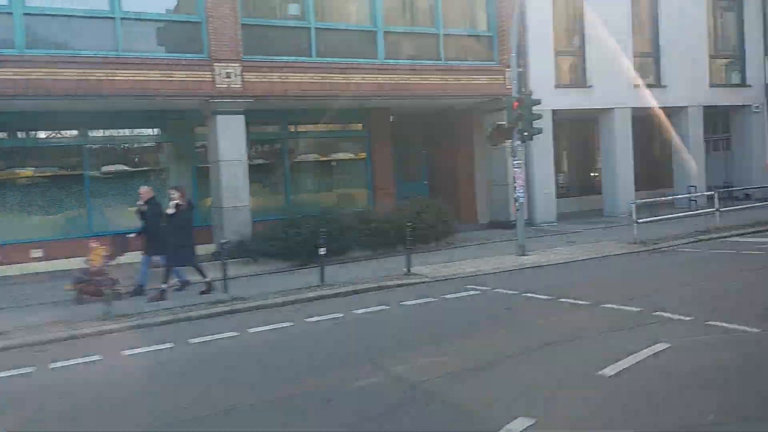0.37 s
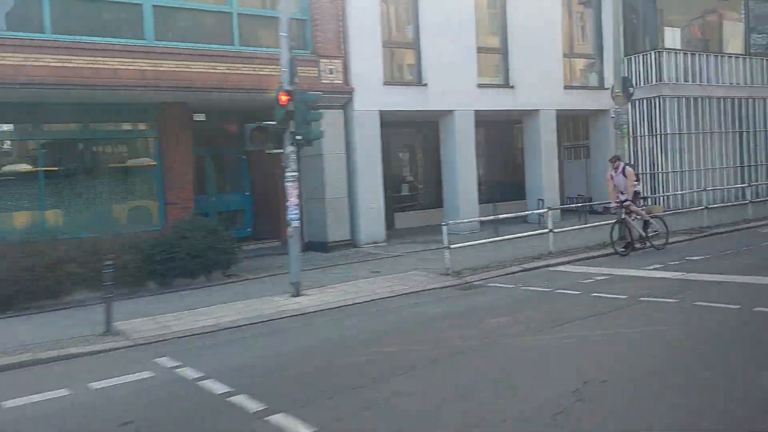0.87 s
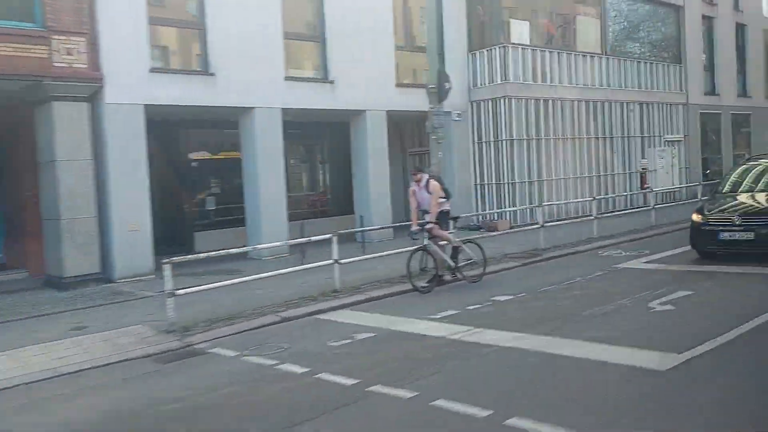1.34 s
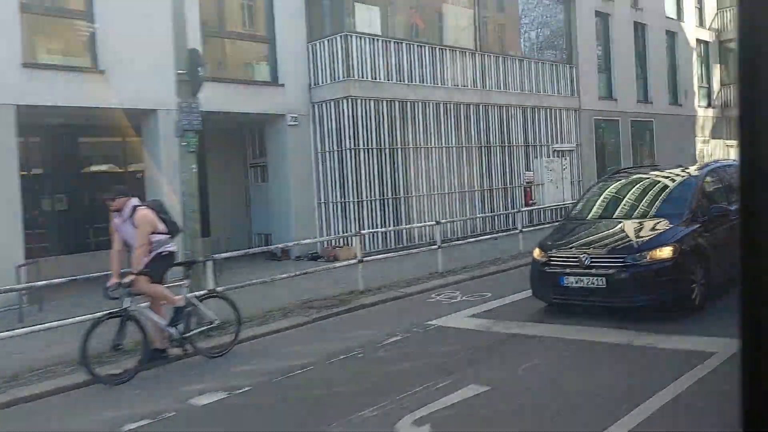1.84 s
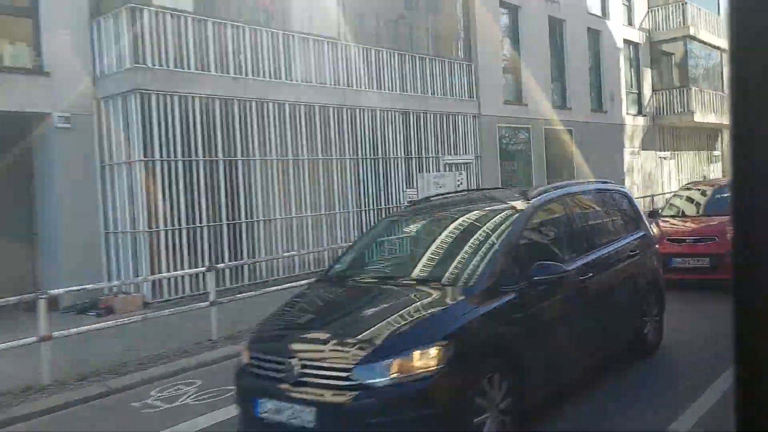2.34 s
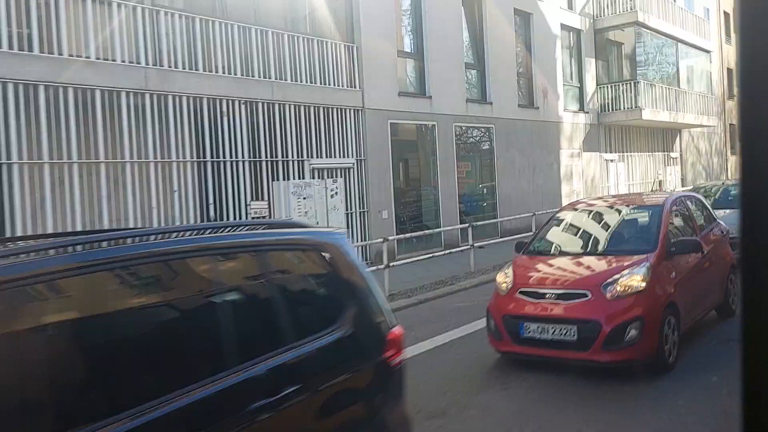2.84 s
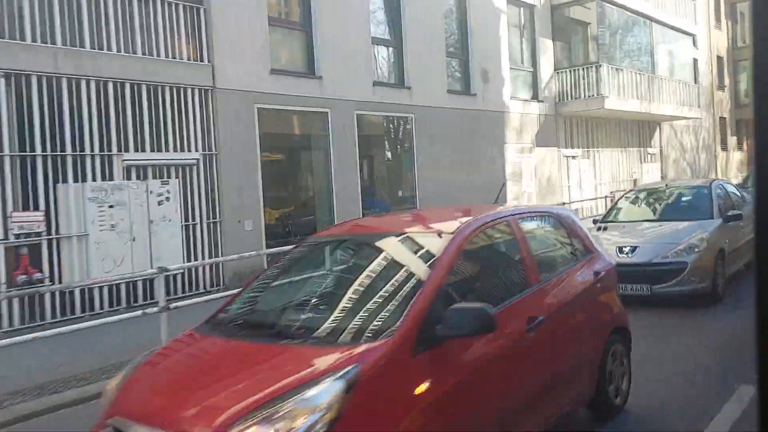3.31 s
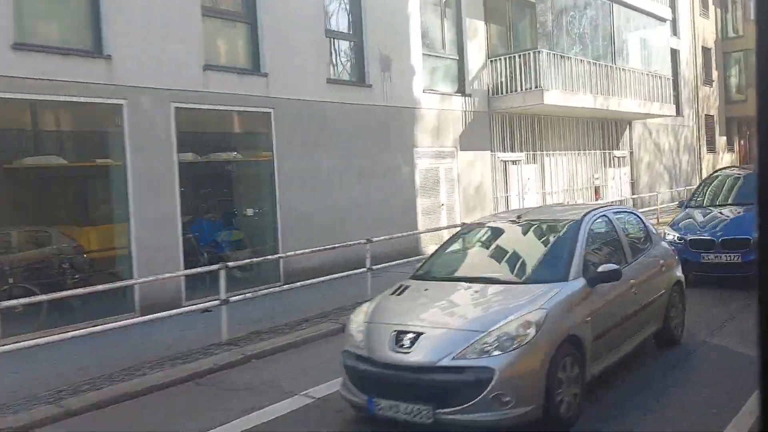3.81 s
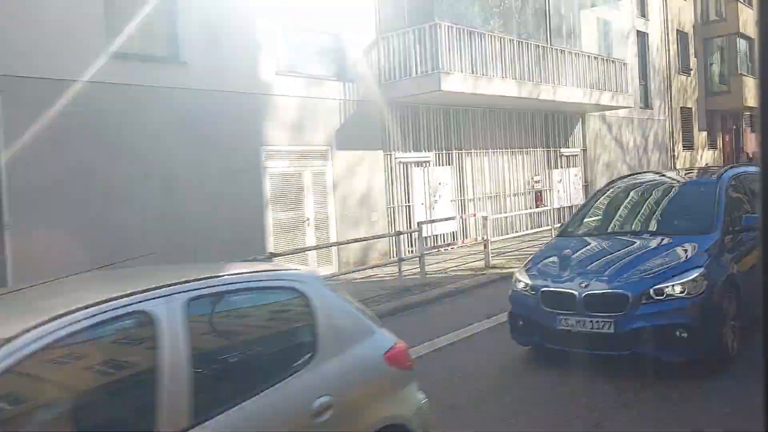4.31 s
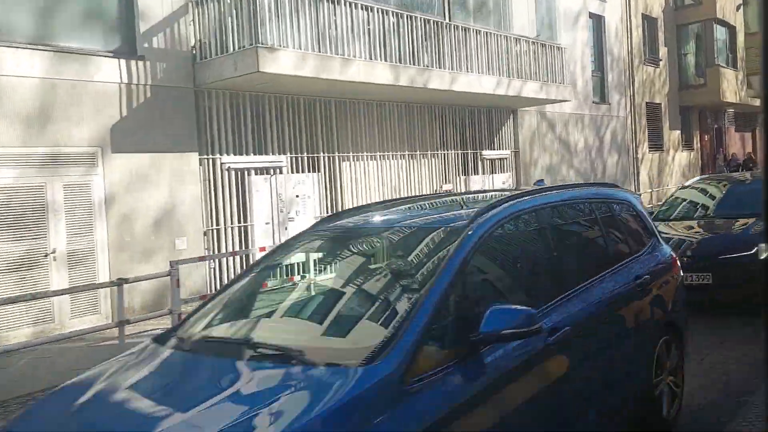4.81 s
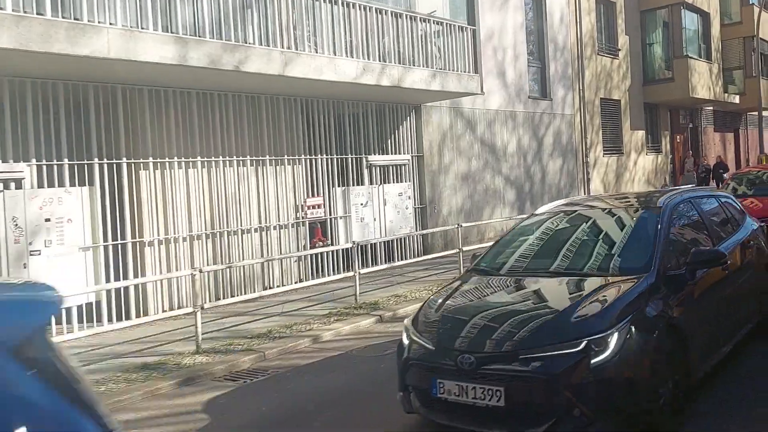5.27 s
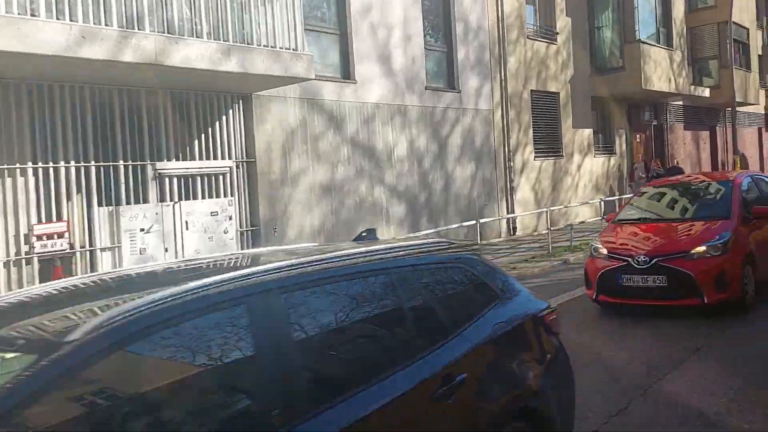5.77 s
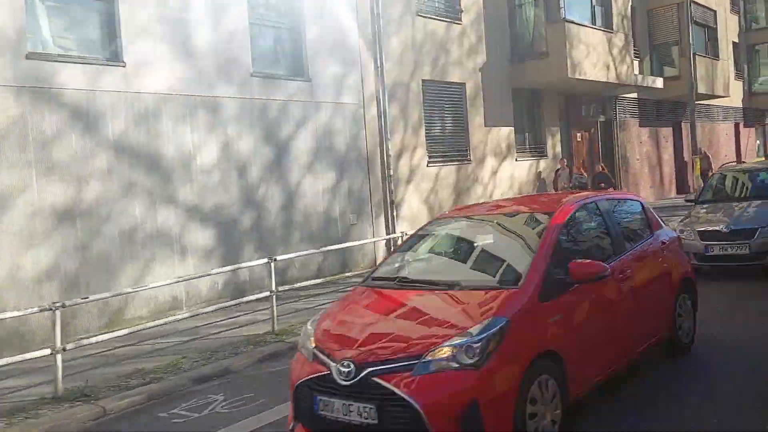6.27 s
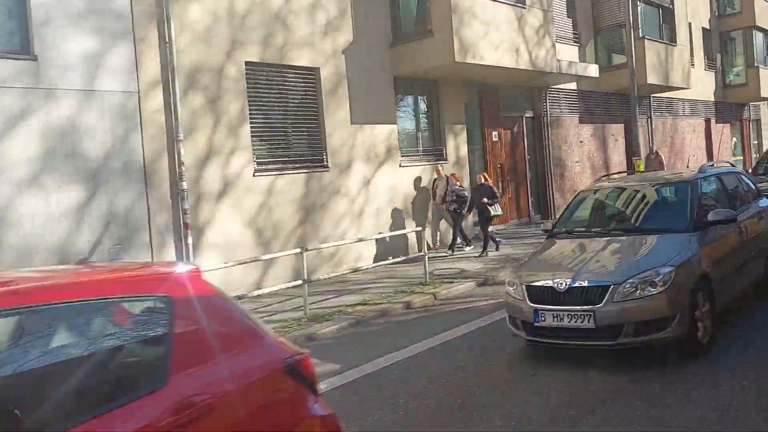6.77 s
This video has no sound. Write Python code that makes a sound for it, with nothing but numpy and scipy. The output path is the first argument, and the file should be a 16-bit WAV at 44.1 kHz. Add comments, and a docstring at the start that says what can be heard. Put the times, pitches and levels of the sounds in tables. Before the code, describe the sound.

Heard from a seat inside a city bus: a heavy diesel hums through the floor, rising slightly in pitch as it pulls gently, over boomy tyre rumble. One soft thud comes early, then small dry squeaks and ticks from loose fittings, a cluster of dull bumps near the middle, more chirps, and another thud late. The engine eases off in the last moments.

```python
"""A six-cylinder diesel hums through the floor of a city bus that pulls away gently, then eases off near the end.
Its hum is a stack of multiples of the engine cycle, lifted by floor modes; injectors tick as noise bursts.
Tyres rumble as filtered noise that rings the cabin and panels, under thin wavering whines.
Loose fittings chirp over bumps with scrapes, squeals and pings, and the body thuds now and then as damped tones."""
import sys
import numpy as np
from scipy import signal
from scipy.fft import rfft, irfft
from scipy.io import wavfile
from scipy.ndimage import uniform_filter1d

SR = 44100
rng = np.random.default_rng(int(sys.argv[2]) if len(sys.argv) > 2 else 0)


def gain_from_db(level_db):
    """Turn a decibel level (scalar or array-like) into a linear amplitude factor."""
    decades = np.asarray(level_db, float) / 20
    return 10 ** decades


def to_wav(sig):
    """Store sig (one row per channel, or 1-D mono) as 16-bit WAV at the path in sys.argv[1].

    Samples outside -1..1 are clipped; the rate is SR.
    """
    pcm = np.clip(np.atleast_2d(sig), -1, 1) * 32767
    pcm = np.round(pcm).astype(np.int16)
    wavfile.write(sys.argv[1], SR, pcm.T)  # frames by channels


N = 314433
TIME = np.arange(N) / SR
BINS = np.fft.rfftfreq(N, 1 / SR) + 1e-3  # Hz, kept above zero for the log axis

# Engine speed: start_s, firing_hz
ENGINE_SPEED = [(0, 46.67), (1.8, 50.62), (3.6, 54.62), (4.2, 55.27), (5.8, 56.8), (7.13, 56.38)]
# Driver's foot: start_s, throttle (0 = released, 1 = steady pull, slightly more when pressed harder)
THROTTLE_MOVES = [(0, 0.95), (3.5, 1.033), (4.8, 0.98), (5.5, 0.97), (6.28, 0.88), (6.5, 0.47), (7.13, 0)]
# Engine multiples at the mounts, at MID_FIRING_HZ under steady pull, ahead of the floor modes:
# multiple of the engine cycle, level_db, gain_db_per_hz of firing rate
ENGINE_MULTIPLES = [(6, -34, -.6), (9, -42, -.8), (10, -39.5, .6), (11, -48, 3), (12, -35.5, -.6),
                    (13, -44.5, .6), (14, -49, .1), (15, -50, -2.7), (16, -57.5, -.1), (18, -41.5, 1.5),
                    (20, -45, -.6), (24, -33.5, .6), (26, -44.5, -1.1), (27, -45, -2.3), (28, -49, -1.2),
                    (30, -47, -.6), (32, -55.5, -1.7), (36, -41, .6), (42, -36.5, -.8), (48, -49, -1.2)]
# Floor modes that lift each multiple as it sweeps through: mode_hz, width_hz, level_db
FLOOR_MODES = [(59, 6, 11.5), (77, 10, 8.5), (115.5, 8.5, 9), (133.2, 8.5, 28), (154, 12, 4.5),
               (197, 15, 1), (255.5, 28, 15), (304.5, 20, 10.5)]
# Slow swells: start_s, firing_tone_db, boom_db (also the other engine multiples), rumble_db, hiss_db (and air)
SLOW_SWELLS = [(0, 0, -1, -2, -1), (.9, -1, 0.5, 0.5, 0.5), (1.7, -1, 0, 2, 1), (2.2, 1, 3, -1, 0),
               (2.8, 6, -1.5, -2, -.5), (3.3, 3, -1, 0.5, -0.5), (3.7, -12, -1.5, 0, -0.5),
               (4.1, -1, 0.5, -0.5, 0), (4.5, 0, -1, 1, 0.5), (5.3, 2, 0.5, 0, 1), (5.8, 0.5, -1, 0.5, 0.5),
               (6.3, 0.5, -0.5, -1, -0.5), (7.13, 1, -1.5, 3, -0.5)]
# Spectral shape of road noise, relative within each band: frequency_hz, level_db (per Hz)
ROAD_SHAPE = [(15, -53), (25, -20.5), (113, -1.5), (136, -2.5), (180, -6.5), (246, 1.5), (446, -22),
              (806, -26), (1170, -28.5), (1340, -29.5), (1580, -31), (7330, -59), (9090, -68.5),
              (12600, -62), (15600, -70)]
# Panels and air modes rung by the road noise: mode_hz, width_hz, level_db above the noise
CABIN_MODES = [(71.4, 17, 6.5), (117, 51, -7.5), (240, 58, -8.5), (381.7, 57, 7.5), (541, 70, 5),
               (665, 34, 5), (804, 52, 8), (1340, 56, -1.5), (1517, 24, -2.5), (1903, 59, 4.5),
               (2143, 48, 7)]
# Narrow panel modes: mode_hz, width_hz, level_db above the noise
PANEL_MODES = [(626, 22, 6), (698, 14, 6), (945, 20, 4), (977, 22, 4), (1045, 18, 6), (1105, 36, 5.5),
               (1195, 30, 6), (1454, 16, 5), (1649, 16, 7), (1753, 20, 7.5), (1965, 25, 4)]
# Stereo likeness: frequency_hz, likeness of left and right (0-1)
STEREO_LIKENESS = [(60, .96), (130, .93), (290, .89), (400, .87), (700, .72), (1100, .4), (1350, .08),
                   (1950, .3), (2600, .08), (15000, .08)]
# Stereo lean: frequency_hz, left_minus_right_db
STEREO_LEAN = [(60, -4), (110, 2), (200, -3), (420, 3), (650, 1.5), (1050, -6.5), (1500, -2.5), (1900, 5),
               (3200, 5.5), (3900, 0), (5800, 4), (7500, 12), (9000, 2), (11500, -3.5), (15000, 0)]
# Edges of boom, rumble, roar, hiss and air: edge_hz
ROAD_EDGES_HZ = [20, 180, 420, 2500, 8800, 16500]
# Boom, rumble, roar, hiss, air: start_level_db, change_db_per_s, off_throttle_db, slow_swell_db
ROAD_LEVELS = [(-24.5, 0.24, -3.5, 0.84), (-22, -0.35, -4, 0.98), (-28.5, -0.46, -2, 0.21),
               (-47, -0.21, -2.5, 0.12), (-67, -0.02, -5, 0.5)]
# Thin tones that come and go: start_s, end_s, pitch_hz, width_hz, level_db ahead of flutter and panning
THIN_TONES = [(-.1, 2.4, 1572, 8, -47.5), (2.85, 5.6, 1577, 7, -49.5), (5.7, 7.2, 1557, 6, -51),
              (3.55, 4.25, 3715, 35, -57), (4.25, 4.85, 3704, 40, -59), (5.75, 7.2, 5410, 12, -68),
              (3.015, 3.075, 1720, 60, -44), (3.69, 3.77, 1755, 50, -46), (3.935, 3.985, 5280, 300, -57),
              (3.2, 3.7, 540, 30, -39), (5.8, 7.2, 626, 5, -45), (5.3, 6.75, 358, 8, -36),
              (6.6, 7.2, 197, 5, -34.5)]
# Injector ticks, ahead of each tick's own size: start_s, level_db
TICK_LEVELS = [(0, -65), (1.2, -55.5), (1.5, -53), (1.9, -53.5), (2.3, -58), (4.3, -63.5), (6.2, -61.5),
               (7.13, -68.5)]
# Fittings that chirp, relative levels ahead of the cabin: start_s, scrape_db, squeal_db, ping_db, ping_hz
FITTING_CHIRPS = [(0.0344, -45, -60, -59, 3550), (1.924, -44.5, -59, -49, 3150),
                  (2.0203, -38, -50, -39, 3000), (2.1092, -40, -54, -33, 3290), (2.32, -55, -68, -58, 3300),
                  (2.43, -52, -68, -56, 3300), (2.4738, -46, -65, -49, 3010), (2.7452, -55, -62, -56, 3747),
                  (2.9914, -53.5, -61, -56, 3250), (3.027, -44, -71, -52, 3522),
                  (3.238, -41, -49, -43, 3134), (3.2420, -52, -51, -43, 4200),
                  (3.3125, -39.5, -36, -43, 3300), (3.4341, -41.5, -46, -44, 3150),
                  (3.706, -45, -54.5, -48, 3300), (3.815, -48.5, -73, -49, 3730),
                  (3.94, -48, -77, -44, 3710), (4.1505, -47.5, -64, -49, 3700),
                  (4.1805, -46, -35.5, -40, 3920), (4.189, -51, -30.5, -42, 3780),
                  (4.198, -48, -55, -41, 3250), (4.655, -54.5, -62.5, -54, 3320),
                  (5.296, -50.5, -65.5, -52, 3490), (5.3288, -45, -41, -38, 3770),
                  (5.338, -49.5, -55.5, -47, 6100), (5.6394, -41.5, -39, -38, 3300),
                  (5.652, -51, -55.5, -40, 4020), (5.723, -50, -66.5, -50, 3993),
                  (6.047, -50, -65, -52, 4800), (6.06, -51, -50.5, -49, 5600),
                  (6.0804, -47.5, -41.5, -42, 4048), (6.0913, -47.5, -62, -33, 7130),
                  (6.575, -57, -70, -60, 3400), (6.72, -58, -70, -60, 3400),
                  (6.78, -56.5, -70.5, -60, 3400)]
# Squeal partials, the third heard most: multiple of the slip rate, level_db
SQUEAL_PARTIALS = [(1, -17.5), (2, -12.5), (3, 2.5), (4, -19)]
# Clack of the fittings, a gain that is squared in use: mode_hz, width_hz, level_db
CLACK_MODES = [(3250, 710, -3), (3650, 610, -5.5), (4240, 590, -4.5), (6200, 330, -6)]
# Body thuds over bumps, ahead of the pan mode levels: start_s, level_db, t60_s
BODY_THUDS = [(1.074, -6.5, .095), (3.21, -12, .2), (3.232, -9, .15), (3.295, -8.5, .25), (3.372, -8, .12),
              (3.458, -9.5, .12), (5.864, -7.5, .094)]
# Modes of the floor pan: mode_hz, level_db
FLOOR_PAN_MODES = [(248, 0), (362, -9), (535, -15)]

MID_FIRING_HZ = 52  # firing rate at which the engine levels hold
COAST_DB = -17.5  # change of every engine multiple when the throttle closes
CHIRP_S, SQUEAL_S, PING_S = 0.015, 0.0064, 0.013  # envelope lengths
SQUEAL_HZ, SQUEAL_SPREAD_HZ = 11690, 70  # third partial of the squeal
SQUEAL_LAG_S = 0.0055  # squeal and ping follow the scrape
FAINT_CHIRPS, FAINT_DB = 10, -61  # extra chirps, barely heard
LEFT_LAG = 11  # samples by which small sounds reach the left later
CABIN_T60_S = 0.31
TAIL_TOP_HZ = 11000  # seats and air dull the tail above this


def unit(x):
    """Scale to rms 1."""
    return x / np.sqrt(np.mean(x ** 2))


def over_hz(table, hz):
    """Read (Hz, value) points on a log axis."""
    points_hz, values = np.array(table).T
    return np.interp(np.log(hz), np.log(points_hz), values)


def walk(rate):
    """Random levels held 1 / rate s and slewed twice; spread near 1."""
    hold = int(SR / rate)
    steps = np.repeat(rng.standard_normal(N // hold + 1), hold)
    return 1.3 * uniform_filter1d(uniform_filter1d(steps, hold), hold)[:N]


def peaks(modes):
    """Gain over frequency of a set of (Hz, width, dB) resonances."""
    return np.sqrt(sum(gain_from_db(2 * db) / (1 + (2 * (BINS - hz) / width) ** 2) for hz, width, db in modes))


def noise(gain):
    """White noise through a gain over frequency, rms 1."""
    return unit(irfft(rfft(rng.standard_normal(N)) * gain, N))


def leaning(spectra):
    """Left and right each favour their own bands."""
    lean = gain_from_db(over_hz(STEREO_LEAN, BINS) / 2)
    return spectra * np.array([lean, 1 / lean])


def engine(cycles, firing_hz, throttle, swell_db, wander_db=1.6, phase_shake_rad=0.2):
    """Unequal cylinders repeat once a cycle, so multiples of the cycle sound; the floor modes colour them."""
    hum = 0
    for multiple, db, db_per_hz in ENGINE_MULTIPLES:
        hz = multiple * firing_hz / 6  # six firings a cycle
        floor_gain = sum(gain_from_db(mode_db) / (1 + (2 * (hz - mode_hz) / width) ** 2)
                         for mode_hz, width, mode_db in FLOOR_MODES)
        level_db = db + db_per_hz * (firing_hz - MID_FIRING_HZ) + (1 - throttle) * COAST_DB
        level_db = level_db + wander_db * walk(4.15)
        level_db = level_db + swell_db[0 if multiple == 6 else 1]  # the firing tone swells on its own
        phase = 2 * np.pi * (multiple * cycles + rng.random()) + phase_shake_rad * walk(6)
        hum = hum + floor_gain * gain_from_db(level_db) * np.sqrt(2) * np.sin(phase)
    return hum


def road(cycles, throttle, swell_db, throb=0.12):
    """Bands of tyre and body noise ring the cabin and panel modes; left and right are most alike in the bass."""
    rung = np.sqrt(1 + peaks(CABIN_MODES + PANEL_MODES) ** 2) * gain_from_db(over_hz(ROAD_SHAPE, BINS))
    alike = np.clip(over_hz(STEREO_LIKENESS, BINS), 0, 1)
    mid = rfft(rng.standard_normal(N)) * rung * np.sqrt(1 + alike)
    side = rfft(rng.standard_normal(N)) * rung * np.sqrt(1 - alike)
    pair = leaning(np.array([mid + side, mid - side]))
    bands = []
    for low_hz, top_hz, levels in zip(ROAD_EDGES_HZ, ROAD_EDGES_HZ[1:], ROAD_LEVELS):
        db, change_db, coast_db, drift_db = levels
        band = unit(irfft(pair * ((BINS >= low_hz) & (BINS < top_hz)), N))
        level_db = db + change_db * TIME + coast_db * (1 - throttle) + drift_db * walk(2.5)
        bands.append(band * gain_from_db(level_db))
    boom, rumble, roar, hiss, air = bands
    # combustion noise swells once a firing in the upper bands
    beat = 1 + throb * np.sin(2 * np.pi * 6 * cycles)
    upper = beat * (roar + gain_from_db(swell_db[3]) * (hiss + air))
    return boom * gain_from_db(swell_db[1]) + rumble * gain_from_db(swell_db[2]) + upper


def whines(lead_rad=1.2, flutter_db=1.5, flutter_db_per_hz=0.025):
    """Tones whose pitch shakes within their width, wide ones in beads; they lean to the right."""
    out = 0
    for start, end, hz, width, db in THIN_TONES:
        fade = np.clip(np.minimum(TIME - start, end - TIME) / 0.0088, 0, 1)
        phase = 2 * np.pi * np.cumsum(hz + width / 2 * walk(120)) / SR
        depth_db = flutter_db + flutter_db_per_hz * min(width, 50)
        level = gain_from_db(db + depth_db * walk(60)) * np.sqrt(2) * fade
        out = out + level * np.array([0.8 * np.sin(phase), 1.2 * np.sin(phase + lead_rad)])
    return out


def ticks(cycles, scatter_db=5.1, decay_s=0.0017, weak_db=-4):
    """An injector ticks at each firing, every other one weaker, each of its own size."""
    beat = 6 * cycles + 0.15
    sizes = gain_from_db(scatter_db * rng.standard_normal(500) + weak_db * (np.arange(500) % 2))
    since_s = (beat % 1) / np.gradient(beat) / SR
    burst = noise(peaks([(10100, 3100, 0.5), (14000, 4000, -0.5)]) ** 2)
    tick = sizes[beat.astype(int)] * np.exp(-since_s / decay_s) * burst
    return tick * gain_from_db(np.interp(TIME, *np.transpose(TICK_LEVELS)))


def faint_chirps():
    """Rows like those of the loud chirps, at random moments."""
    moment, size, pitch = rng.random((FAINT_CHIRPS, 3)).T
    start_s = 0.02 + moment * (TIME[-1] - 0.1)
    db = FAINT_DB + 8 * (size - 0.5)
    return list(zip(start_s, db, db - 8, db + 6, 3000 + 800 * pitch))


def slip(since_s, length_s):
    """Envelope of a slip: it builds up, then stops quickly."""
    u = since_s / length_s
    return 2.4 * u * np.exp(-u ** 2)


def chirps(shake=0.008, clack_db=-3, grain_db=2, sag=0.015, lead_s=0.003):
    """A short slip scrapes in uneven grains, clacks, squeals at its slip rate and pings; noisy and tonal parts."""
    scrape = noise(peaks([(3650, 6400, -1), (6860, 5000, -11), (11500, 1800, -3.5), (14800, 2900, -2.5)]) ** 2)
    clack = noise(peaks(CLACK_MODES) ** 2)
    wobble = 1 + shake * walk(500)
    grain = gain_from_db(grain_db * walk(900) - 1.14)
    noisy, tonal = np.zeros((2, N))
    rows = FITTING_CHIRPS + faint_chirps()
    pitches = SQUEAL_HZ + SQUEAL_SPREAD_HZ * rng.standard_normal(len(rows))
    for squeal_hz, (s, scrape_db, squeal_db, ping_db, ping_hz) in zip(pitches, rows):
        # the slip builds up just before it is heard
        span = slice(int((s - lead_s) * SR), int((s + 3 * CHIRP_S) * SR))
        since = TIME[span] - s + lead_s + 1 / SR
        # pitch wobbles and sags through the slip
        turns = 2 * np.pi * np.cumsum(wobble[span] - sag * (since / CHIRP_S - 0.5)) / SR
        squeal = sum(gain_from_db(db) * np.sin(k * squeal_hz / 3 * turns) for k, db in SQUEAL_PARTIALS)
        # a ping has a softer octave; scrapes under -53 dB set it off less
        ping = np.sin(ping_hz * turns) + 0.25 * np.sin(2 * ping_hz * turns)
        ping = ping * min(1, gain_from_db(scrape_db + 53))
        rub = gain_from_db(scrape_db - 2.5) * scrape[span] + gain_from_db(scrape_db + clack_db) * clack[span]
        noisy[span] += slip(since, CHIRP_S) * grain[span] * rub
        tonal[span] += slip(since, SQUEAL_S) * gain_from_db(squeal_db) * squeal
        tonal[span] += slip(since, PING_S) * gain_from_db(ping_db) * ping
    return noisy, np.roll(tonal, int(SQUEAL_LAG_S * SR))


def cabin(x, wet_db):
    """Direct sound from the right, plus a diffuse tail unrelated left and right."""
    t = TIME[:SR // 2]
    tail = rng.standard_normal((2, len(t))) * np.exp(-np.log(1000) * t / CABIN_T60_S)
    tail = tail / np.sqrt(np.sum(tail ** 2, axis=1, keepdims=True))
    tail = signal.lfilter(*signal.butter(1, TAIL_TOP_HZ, fs=SR), tail)
    direct = np.array([gain_from_db(-4) * np.roll(x, LEFT_LAG), gain_from_db(-2) * x])
    return direct + gain_from_db(wet_db) * signal.fftconvolve(x[None], tail, axes=1)[:, :N]


def thuds(rise_s=0.009):
    """A soft blow rings the floor pan."""
    out = 0
    for s, db, t60 in BODY_THUDS:
        t = np.maximum(TIME - s, 0)
        ring = sum(gain_from_db(mode_db) * np.sin(2 * np.pi * hz * t) for hz, mode_db in FLOOR_PAN_MODES)
        out = out + gain_from_db(db) * (1 - np.exp(-t / rise_s)) * np.exp(-np.log(1000) * t / t60) * ring
    return out


def scene():
    """Engine and thuds reach both sides through the floor, slightly earlier left; small sounds ring in the cabin."""
    firing_hz = np.interp(TIME, *np.transpose(ENGINE_SPEED))
    cycles = np.cumsum(firing_hz) / (6 * SR)
    throttle = np.interp(TIME, *np.transpose(THROTTLE_MOVES))
    swell_s, *swell_columns = np.array(SLOW_SWELLS).T
    swell_db = [np.interp(TIME, swell_s, column) for column in swell_columns]
    floor = engine(cycles, firing_hz, throttle, swell_db) + thuds()
    left, right = floor * gain_from_db(np.array([[0.7], [1.5]])) + road(cycles, throttle, swell_db)
    noisy, tonal = chirps()
    # scrapes and ticks spread through the cabin; squeals and pings arrive more directly
    small = cabin(noisy + ticks(cycles), wet_db=5) + cabin(tonal, wet_db=-6.5)
    return np.array([left, np.roll(right, 2)]) + whines() + irfft(leaning(rfft(small)), N)


def band_limit(x):
    """A steep low-pass at the top of the band."""
    return signal.sosfilt(signal.butter(12, 15720, fs=SR, output="sos"), x)


def record(dry):
    """Both channels have a dip just below 9 kHz."""
    dip = 1 - 0.44 / (1 + ((BINS - 8900) / 350) ** 2)
    return band_limit(irfft(rfft(dry) * dip, N))


dry = scene()
out = record(dry)
to_wav(out)
```